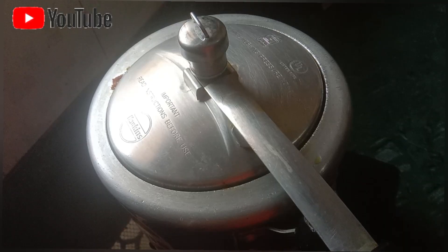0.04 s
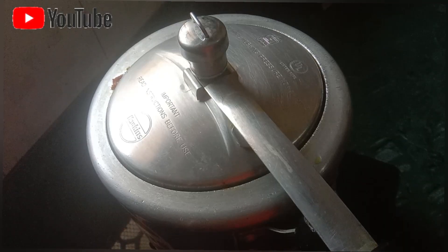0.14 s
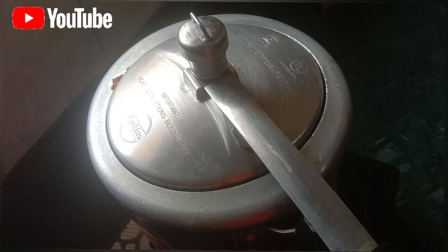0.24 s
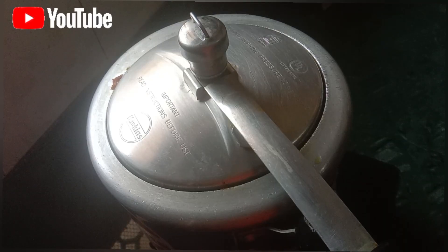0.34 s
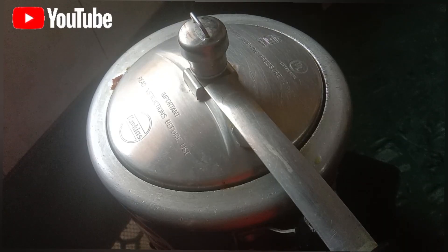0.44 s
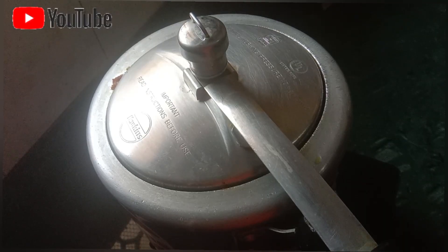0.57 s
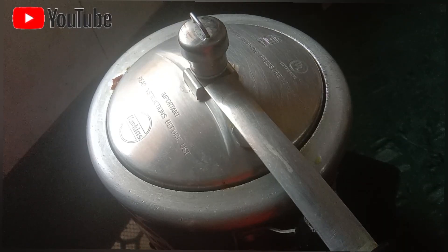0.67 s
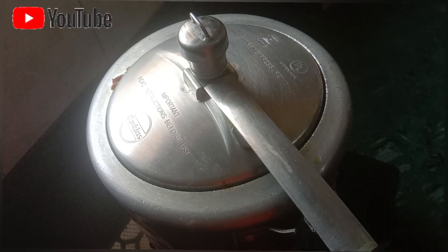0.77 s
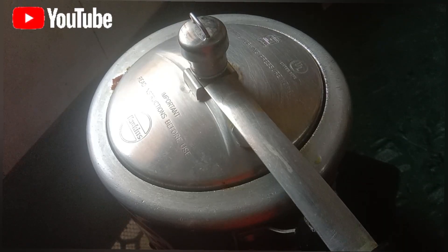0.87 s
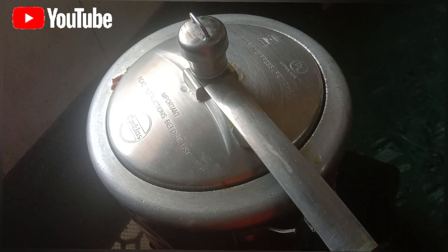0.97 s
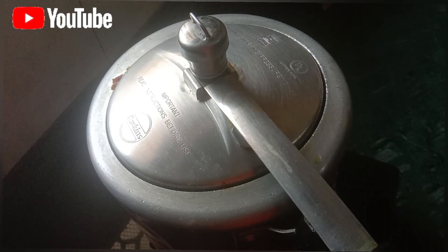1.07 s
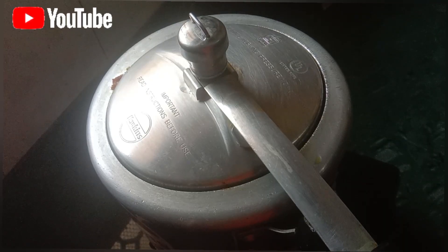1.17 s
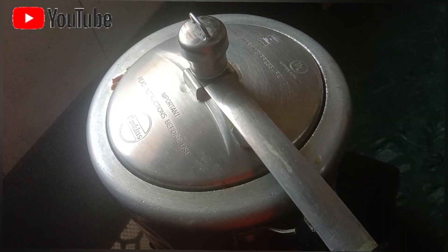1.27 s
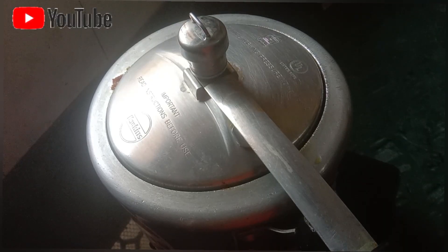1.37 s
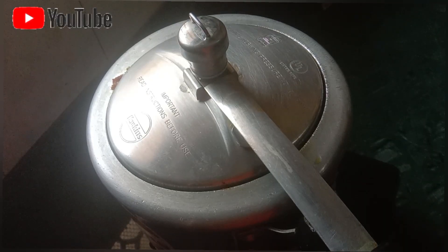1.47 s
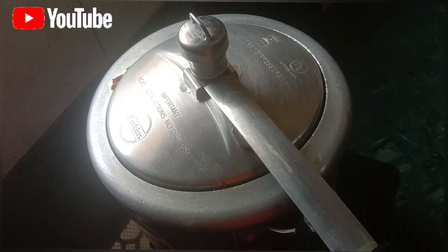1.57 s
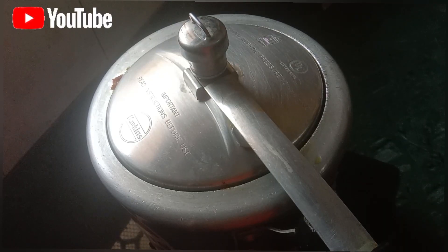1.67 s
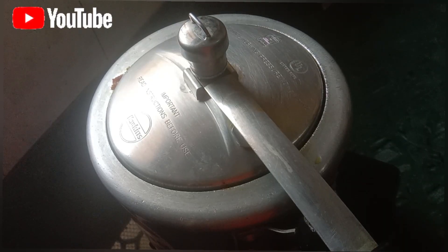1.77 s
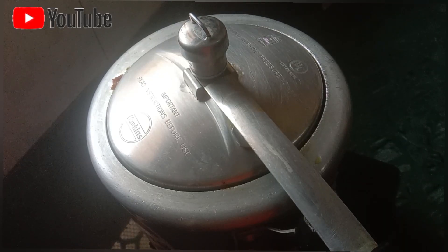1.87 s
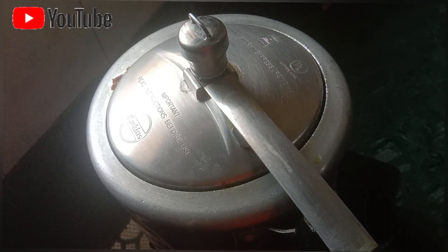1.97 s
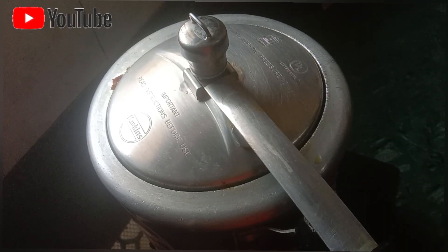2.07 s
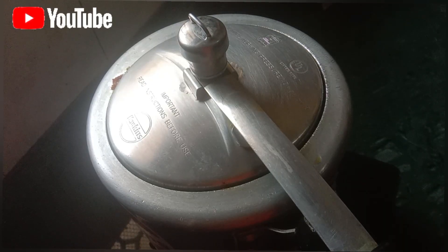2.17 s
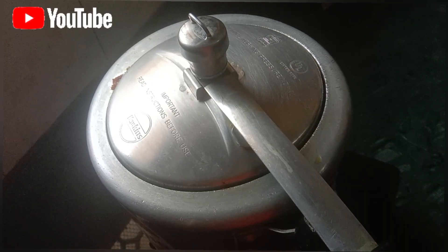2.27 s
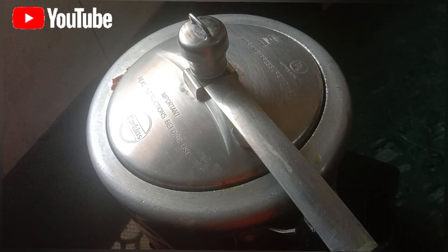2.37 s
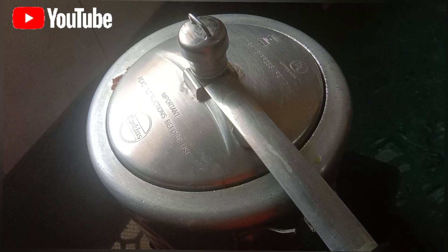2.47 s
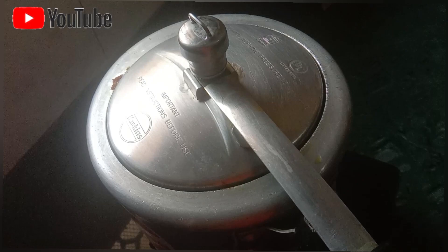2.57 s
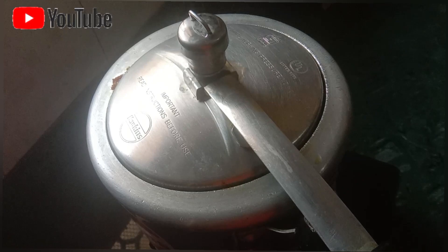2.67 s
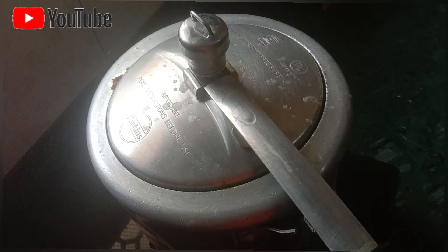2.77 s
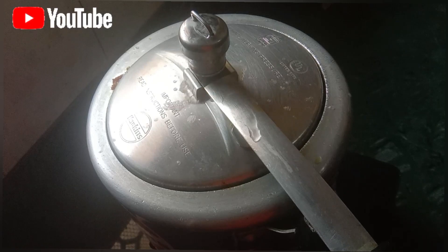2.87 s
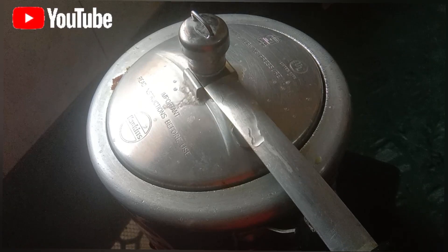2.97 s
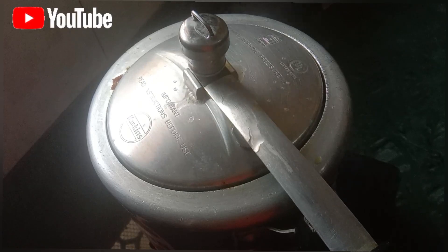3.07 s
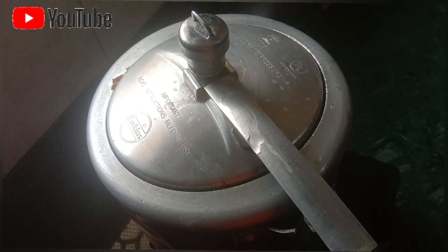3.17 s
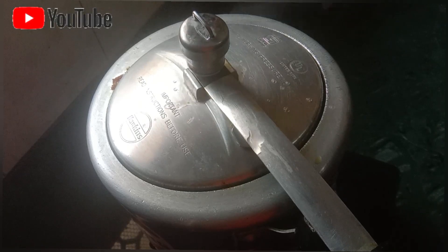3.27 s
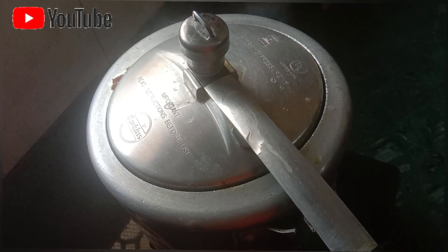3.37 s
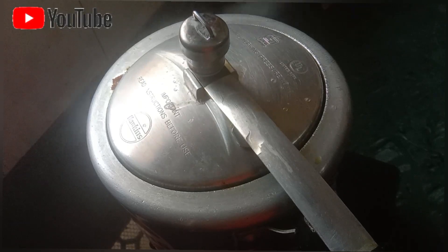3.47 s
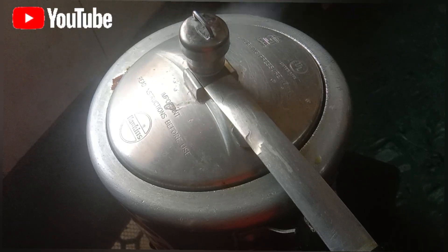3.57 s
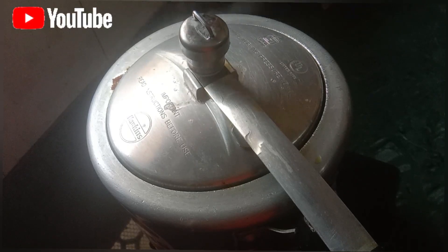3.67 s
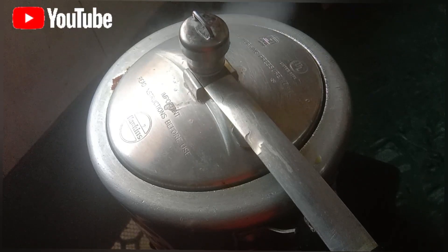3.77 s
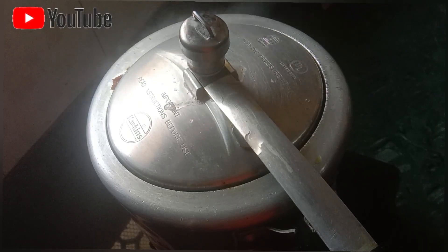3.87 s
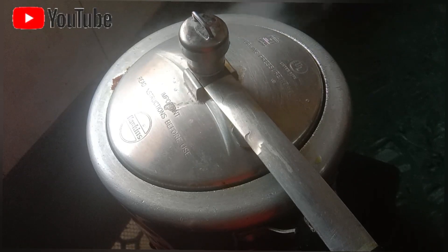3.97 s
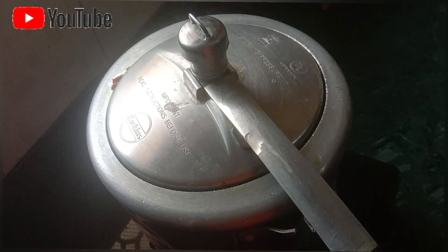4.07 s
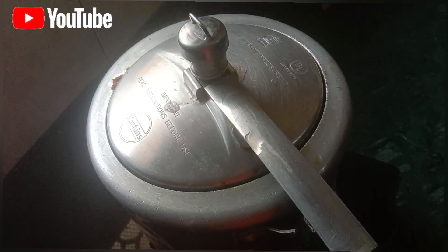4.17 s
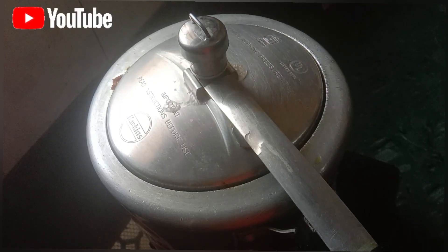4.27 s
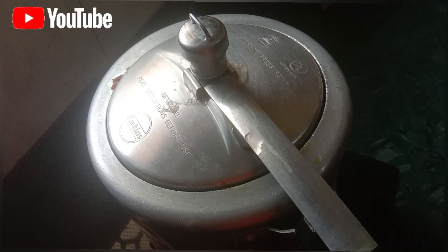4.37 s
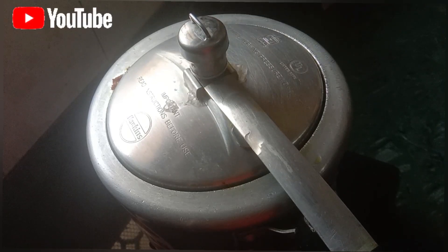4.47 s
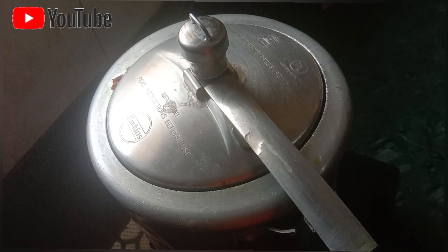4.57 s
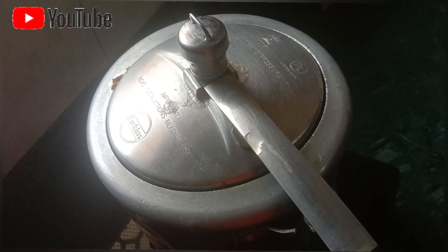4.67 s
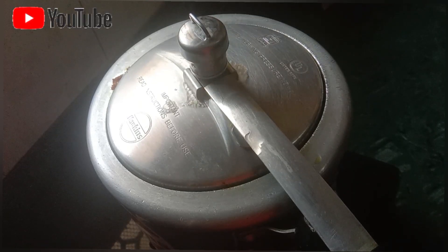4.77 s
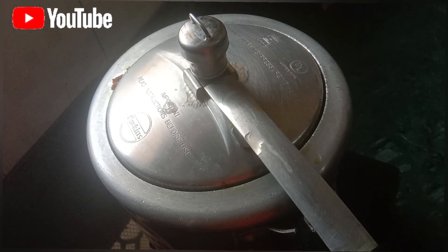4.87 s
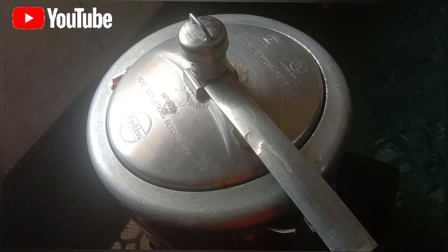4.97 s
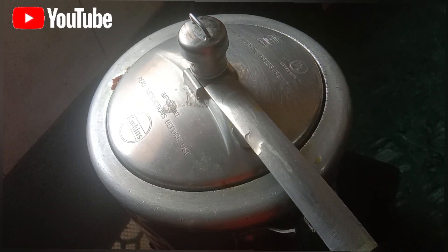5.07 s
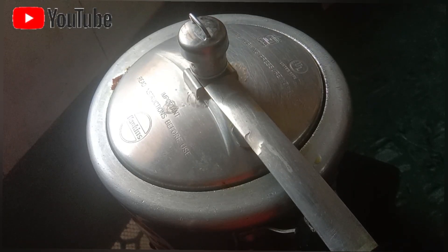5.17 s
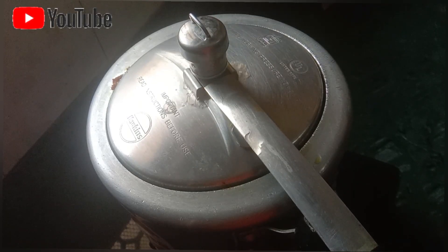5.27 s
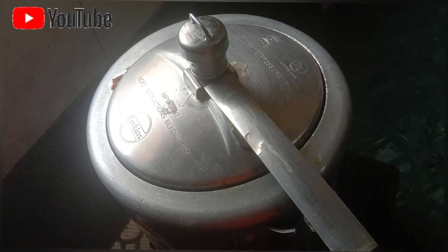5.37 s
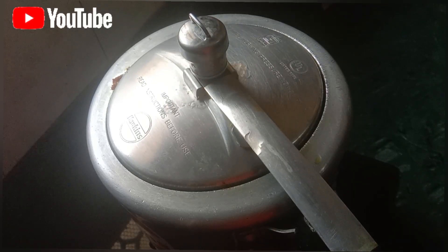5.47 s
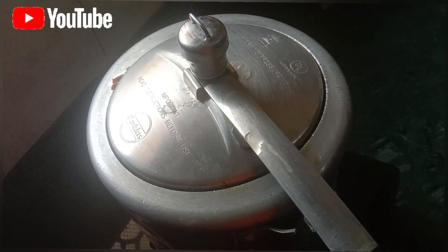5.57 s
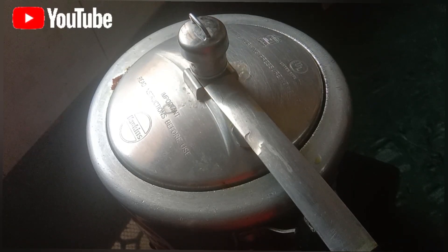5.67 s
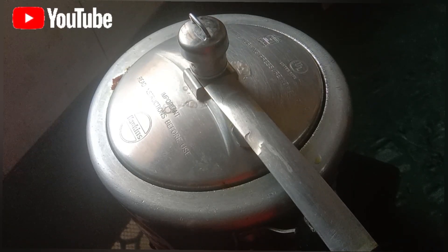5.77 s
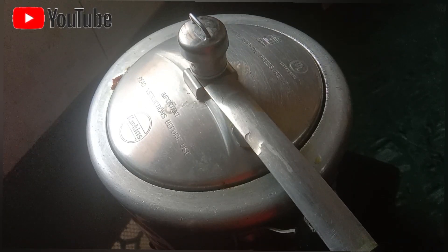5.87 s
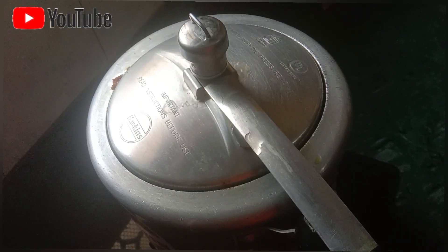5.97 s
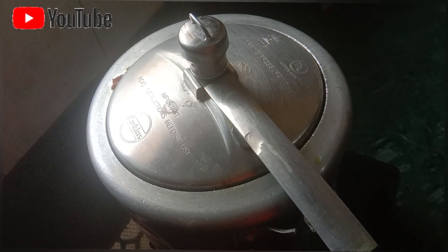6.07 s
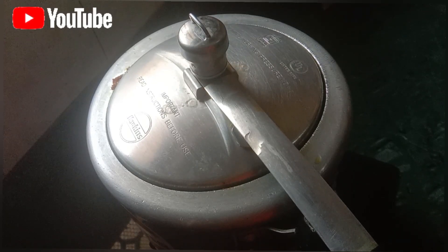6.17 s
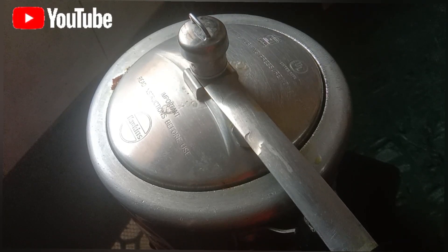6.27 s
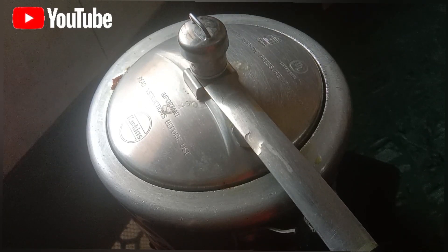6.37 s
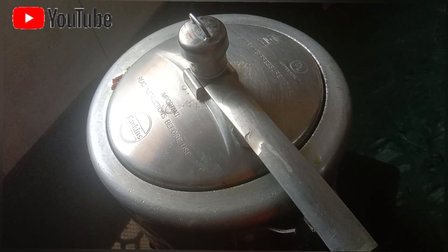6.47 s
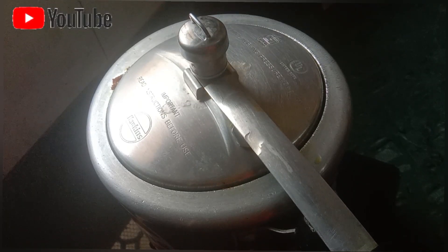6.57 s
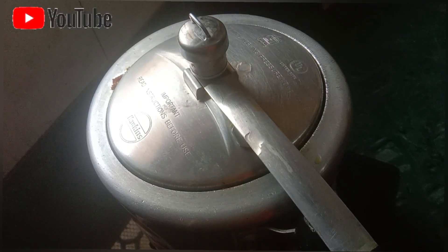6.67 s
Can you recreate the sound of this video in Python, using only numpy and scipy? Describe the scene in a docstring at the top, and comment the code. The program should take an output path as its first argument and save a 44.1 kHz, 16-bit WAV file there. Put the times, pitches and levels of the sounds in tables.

```python
"""A pressure cooker on a stove, a mono phone microphone close by. Steam hisses past the rocking weight
in uneven spurts of patchy noise, with two dull knocks of ringing modes early on. Then the weight lifts: the jet
roars and its blast buffets the microphone in dense random kicks. The weight drops back, the lid rings and sighs,
and the vent seals. A faint background runs throughout and is left at the end: room noise, a wavering hum,
short tonal blips."""
import sys
import numpy as np
from scipy import signal
from scipy.fft import rfft, irfft, next_fast_len
from scipy.io import wavfile
from scipy.ndimage import uniform_filter1d, map_coordinates

SR = 44100
rng = np.random.default_rng(int(sys.argv[2]) if len(sys.argv) > 2 else 0)


def to_wav(sig):
    """Store sig (one row per channel, or 1-D mono) as 16-bit WAV at the path in sys.argv[1].

    Samples outside -1..1 are clipped; the rate is SR.
    """
    pcm = np.clip(np.atleast_2d(sig), -1, 1) * 32767
    pcm = np.round(pcm).astype(np.int16)
    wavfile.write(sys.argv[1], SR, pcm.T)  # frames by channels


N = 296918

# Colour of the room noise. Each row: frequency in Hz, density in dB per Hz (relative).
ROOM_SPECTRUM = [(30, -26), (90, -6.5), (200, -5.5), (730, -11.5), (1170, -8.5), (1970, -11), (3400, -12.5),
                 (4090, -22), (5000, -13.5), (6000, -10), (7400, -7.5), (10500, -8), (10800, -21.5),
                 (13400, -21), (13600, -14.5), (15450, -11)]
# Room noise, sinking once the vent is quiet. Each row: time in seconds, level in dB, lift of its bands in dB.
ROOM_LEVELS = [(0, -54.5, 0), (2.5, -55.5, 0), (4.15, -52.5, 0), (4.4, -61, 1), (4.6, -63.5, -2),
               (5, -63.5, -2.5), (5.25, -63, 2), (5.9, -64, -1.5), (6.3, -64, 2), (6.73, -63, 0)]
# Restless bands of the room noise. Each row: centre in Hz, width in Hz, level in dB before that lift.
RESTLESS_BANDS = [(1340, 150, -72.5), (1524, 380, -71.5), (5150, 250, -80.5), (6485, 420, -71),
                  (6820, 180, -72), (7350, 120, -79.5), (7830, 200, -74), (15150, 500, -77)]
# Steadier overtones of the hum. Each row: frequency in Hz, level in dB relative to the room noise.
HUM_OVERTONES = [(200, -21.5), (300, -19.5)]
# Swells of the hum. Each row: start in seconds, length in seconds, level in dB.
HUM_SWELLS = [(.02, .16, -62), (.25, .56, -54.5), (1.43, .09, -67), (1.6, 0.16, -62), (1.76, 0.34, -51),
              (2.25, .06, -71), (4.12, .27, -52), (4.61, .24, -65), (5.01, .08, -73), (5.47, .15, -65),
              (6.14, .17, -72)]
# The clearest tonal blips. Each row: centre in seconds, mean pitch in Hz, level in dB before it wavers.
CLEAR_BLIPS = [(.419, 1096, -53), (.432, 885, -57), (.52, 130, -55.5), (.64, 497, -57), (.62, 302, -58),
               (.9, 682, -56.5), (1.39, 1455, -45), (1.399, 620, -55), (1.5, 1420, -51), (1.674, 1707, -48),
               (1.73, 140, -52.5), (4.78, 2300, -70), (4.92, 2230, -63.5), (5.65, 1650, -67),
               (5.91, 2340, -71), (6.07, 2110, -71), (5.13, 1700, -67.5), (5.2, 1550, -63.5),
               (5.22, 620, -65), (5.269, 1430, -61), (5.28, 5070, -66), (5.415, 1276, -56),
               (6.41, 5400, -69), (6.202, 1553, -63), (6.28, 1504, -64), (6.419, 1597, -58),
               (6.547, 1295, -65), (6.58, 140, -67), (6.7, 520, -69), (6.59, 1660, -62),
               (6.65, 1470, -61.5), (6.68, 1077, -55)]
# Dull knocks. Each row: start in seconds, nominal level in dB, time to ring down by 60 dB in seconds.
DULL_KNOCKS = [(.104, -26, 0.016), (.304, -27, 0.019)]
# What a knock sets ringing. Each row: frequency in Hz, relative level in dB.
KNOCK_RESONANCES = [(150, -3), (420, -4), (800, -3.5), (1150, 1.5), (1450, -5)]
# The weight dropping back on its seat. One row: time in seconds, nominal level in dB.
DROP_S, DROP_DB = (4.0815, -21.5)
# Modes of the lid. Each row: frequency in Hz, relative level in dB, time to ring down by 60 dB in seconds.
LID_MODES = [(1060, -11.5, 0.11), (1260, -0.5, 0.022), (1330, -6, .03), (1620, -3, .02), (1850, -9, .012)]
# Colour of one buffet at the microphone port. Each row: frequency in Hz, relative level in dB.
BUFFET_SPECTRUM = [(24, -49.5), (40, -20.5), (73, -8), (136, 0), (554, -2), (1180, -0.5), (1470, -2.5),
                   (2120, -10), (3260, -10.5), (4200, -18), (5460, -44.5), (9240, -120)]
# Single eddies that stand out. Each row: start in seconds, size in dB, share of sharp kick against slow push 0-1.
STRONG_GUSTS = [(2.742, -11, .25), (2.769, -7, .8), (2.784, -4, .7), (3.474, -3, .95), (3.98, -4, .95),
                (4.011, -8, .9), (4.038, -5, .4), (4.051, -15, .9)]
# Steam through the vent. Each row: time in seconds, hiss in dB, roar of the wider jet in dB relative to the hiss.
STEAM_LEVELS = [(0, -30.5, -16), (.1, -33, -20.5), (.7, -32.5, -20.5), (.77, -29.5, -21),
                (1.0, -32.5, -19.5), (1.14, -27, -20), (1.22, -39, -18), (1.31, -29.5, -18),
                (1.45, -33, -18.5), (1.52, -29, -18.5), (1.66, -29, -18), (1.76, -38, -16),
                (1.85, -29.5, -20.5), (1.97, -36, -19), (2.03, -27.5, -23), (2.13, -26.5, -12.5),
                (2.21, -32, -16), (2.26, -49, -17), (2.31, -33, -20), (2.37, -28.5, -17),
                (2.42, -33.5, -16.5), (2.475, -48, -17), (2.53, -31, -22), (2.6, -23.5, -11.5),
                (2.7, -24, -11), (2.76, -23, -11), (2.82, -25.5, -9), (2.95, -25.5, -5), (3.12, -24.5, .5),
                (3.35, -24.5, .5), (3.42, -26, -4), (3.75, -25, -1.5), (4.0, -26.5, -7), (4.09, -33.5, -10),
                (4.13, -33, -3.5), (4.16, -28.5, -5.5), (4.26, -39, -7.5), (4.39, -60.5, -16),
                (4.55, -77, -8)]
# How far the weight is lifted off the vent. Each row: time in seconds, lift 0-1.
WEIGHT_LIFT = [(0, 0), (2.55, 0), (2.7, .3), (2.82, 0.8), (4.03, 0.86), (4.07, .5), (4.3, 0.27)]
# Resonances and hollows around weight and lid. Each row: centre in Hz, width in Hz, boost in dB.
VENT_RESONANCES = [(1430, 94, 2.5), (1670, 72, 3.5), (2520, 150, 2), (3180, 180, 1), (3780, 130, 4),
                   (4090, 190, -4.5), (4480, 89, -4.5), (5330, 87, -2.5), (5750, 100, 1.5), (5910, 90, 1),
                   (6190, 110, 4), (6400, 80, 1.5), (6520, 80, 3.5), (6700, 79, -2.5), (6880, 120, 3),
                   (7070, 63, 1), (7280, 300, 3.5), (7900, 88, -5), (9320, 170, -3.5), (10700, 150, -5.5),
                   (12260, 180, 4), (12700, 150, -3), (13730, 150, 3.5), (14100, 120, -2.5),
                   (15250, 120, -1.5)]
# Colours of hiss, its top and the roar, for the weight seated and then lifted.
# Each row: frequency in Hz, density in dB per Hz (relative).
SEATED_HISS = [(2590, -47), (4400, -16), (4820, -6.5), (5380, -4.5), (5930, 0), (6540, -4), (7140, -3),
               (7990, -10.5), (9350, -14), (10100, -12.5), (10500, -10), (13600, -42.5), (22000, -120)]
SEATED_TOP = [(6200, -47), (10500, -20), (11800, -17), (12800, -12), (13400, -8), (14100, -4.5),
              (14500, -0.5), (14900, 1), (15150, -1.5), (15500, -6)]
SEATED_ROAR = [(150, -40), (300, -25.5), (550, -21), (750, -23.5), (1000, -11), (1150, -6), (1700, -1.5),
               (2050, -12.5), (2500, -2.5), (3300, -2.5), (3700, -1.5), (4050, -11.5), (4500, -18),
               (5500, -45.5)]
LIFTED_HISS = [(2240, -35), (3800, -13.5), (4190, -8), (5030, 1), (6280, -1.5), (6920, -7), (7540, -5),
               (8170, -11.5), (8710, -8), (9400, -13), (10500, -8.5), (13600, -41), (22000, -120)]
LIFTED_TOP = [(6200, -45.5), (10500, -15.5), (12900, -11), (13400, -11), (13800, -7), (14300, -8),
              (14900, 1.5), (15500, -4)]
LIFTED_ROAR = [(88, -44), (150, -14), (210, -11), (425, -24), (522, -18), (732, -29), (1090, -0.5),
               (2170, -12.5), (3360, -6), (3780, -11), (5000, -4), (6500, -33), (11000, -120)]

# Hum: pitch, level between swells, noise against line, share of a swell spent rising.
HUM_HZ, HUM_REST_DB, HUM_FUZZ, SWELL_RISE = 92, -84, 0.49, 0.32
BLIP_HALF_S = .05
# Fainter blips: number, central pitch, spread of pitch, central level relative to the room noise.
FAINT_COUNT, FAINT_HZ, FAINT_OCTAVES, FAINT_DB = 24, 1500, .2, -9
# The last steam singing in the lid; then the level of its lowest mode relative to the rest, and how long it holds.
SIGH_DB, SIGH_HOLD_S, SIGH_FADE_DB_PER_S = -41, .15, 148
SIGH_LOW_DB, SIGH_LOW_S = -2.5, .11
BLAST_ON_S, BLAST_ATTACK_S, BLAST_OFF_S, BLAST_RELEASE_S = 2.738, .036, 4.0, .072
BLAST_DB, BLAST_SWAY_DB = -17.5, .6
TOP_DB, TOP_OPEN_DB = 6, -2.5  # top of the hiss relative to the hiss; its change at full lift
TOP_FADE_DB_PER_S, TOP_FADE_MAX_DB = 70, 21  # after the drop the top dies first
SEAL_S, SEAL_TAKES_S = 4.38, .12
BAND_LIMIT_HZ = 15520


def amp(db):
    """Gain of a level in dB."""
    return 10 ** (np.asarray(db) / 20)


def unit(x):
    """Scaled to rms 1."""
    return x / np.sqrt(np.mean(x ** 2) + 1e-20)


def along(points, hz):
    """Values between (Hz, value) points, read on a log frequency axis."""
    f, v = np.transpose(points)
    return np.interp(np.log(hz + 1), np.log(f + 1), v)


def curves(rows):
    """One value per sample for each column after the time."""
    s, *cols = np.transpose(rows)
    return [np.interp(np.arange(N) / SR, s, c) for c in cols]


def wobble(rate):
    """A smooth random curve, rate knots a second."""
    knots = rng.standard_normal(int(N * rate / SR) + 4)
    return map_coordinates(knots, [np.arange(N) * rate / SR])


def filtered(x, response):
    """x times a response of frequency."""
    m = next_fast_len(N + 8192)
    return irfft(rfft(x, m) * response(np.fft.rfftfreq(m, 1 / SR)), m)[..., :N]


def patchy(depth_db):
    """White noise with patches of random gain in time and frequency."""
    z = signal.stft(rng.standard_normal(N), nperseg=512)[2]
    field = uniform_filter1d(rng.standard_normal(z.shape), size=4, axis=0)
    field = uniform_filter1d(field, size=6, axis=1)
    return signal.istft(z * amp(depth_db * unit(field)), nperseg=512)[1][:N]


def coloured(x, spectrum, peaks=()):
    """x with a spectrum and narrow boosts or hollows, rms 1."""
    def response(hz):
        boost = sum(db / (1 + ((hz - c) / w * 2) ** 2) for c, w, db in peaks)
        return amp(along(spectrum, hz) + boost)
    return unit(filtered(x, response))


def band(hz, width, depth_db):
    """A narrow band of patchy noise, rms 1."""
    return unit(filtered(patchy(depth_db), lambda f: np.exp(-((f - hz) / width * 2) ** 2)))


def causal(spectrum):
    """The pulse with this spectrum that starts at once (minimum phase, by folding the cepstrum)."""
    size = 2 ** 13
    gain = amp(along(spectrum, np.fft.rfftfreq(size, 1 / SR)))
    cepstrum = irfft(np.log(gain + 1e-6))
    cepstrum[1:size // 2] *= 2
    cepstrum[size // 2 + 1:] = 0
    return irfft(np.exp(rfft(cepstrum)))[:size // 2]


def hum(room_db):
    """A low line with a fuzzy edge that swells now and then, over steadier overtones."""
    t = np.arange(N) / SR
    level = amp(HUM_REST_DB)
    for start, length, db in HUM_SWELLS:
        swell = np.interp((t - start) / length, [0, SWELL_RISE, 1], [0, 1, 0])
        level = level + amp(db) * np.sqrt(swell)
    line = np.sin(2 * np.pi * HUM_HZ * t)
    out = level * amp(1.5 * wobble(12)) * unit(line + HUM_FUZZ * band(HUM_HZ, 40, depth_db=0.6))
    for hz, db in HUM_OVERTONES:
        out += amp(room_db + db + 3.5 * wobble(8.3)) * np.sin(2 * np.pi * hz * t)
    return out


def blips(room_db):
    """Short tones with wandering pitch: the listed ones and a random scatter of fainter ones."""
    t, out = np.arange(N) / SR, np.zeros(N)
    centre = BLIP_HALF_S + rng.random(FAINT_COUNT) * (N / SR - 2 * BLIP_HALF_S)
    pitch = FAINT_HZ * 2 ** (FAINT_OCTAVES * rng.standard_normal(FAINT_COUNT))
    level = room_db[(centre * SR).astype(int)] + FAINT_DB + 2.5 * rng.standard_normal(FAINT_COUNT)
    faint = zip(centre, np.minimum(pitch, SR / 3), level)
    for s, hz, db in list(CLEAR_BLIPS) + list(faint):
        span = slice(round((s - BLIP_HALF_S) * SR), round((s + BLIP_HALF_S) * SR))
        cycles = np.cumsum(hz * (1 + 0.012 * wobble(45)[span])) / SR
        window = np.cos(np.pi / 2 * (t[span] - s) / BLIP_HALF_S) ** 2
        out[span] += amp(db + 3.8 * wobble(60)[span]) * window * np.sin(2 * np.pi * cycles)
    return out


def background():
    """The faint background: broad patchy room noise with restless bands, the hum and the blips."""
    room_db, bands_db = curves(ROOM_LEVELS)
    out = amp(room_db) * coloured(patchy(depth_db=1.44), ROOM_SPECTRUM)
    for hz, width, db in RESTLESS_BANDS:
        out += amp(db + bands_db + 1.5 * wobble(6)) * band(hz, width, depth_db=3.0)
    return out + hum(room_db) + blips(room_db)


def knocks():
    """Each dull knock rings a few short modes that die away together."""
    out, t = np.zeros(N + SR), np.arange(SR // 4) / SR
    ring = sum(amp(level) * np.sin(2 * np.pi * hz * t) for hz, level in KNOCK_RESONANCES)
    onset = 1 - np.exp(-t / .0004)
    for s, db, t60 in DULL_KNOCKS:
        # the 9.5 dB cut allows for the modes adding up
        out[round(s * SR):][:len(t)] += amp(db - 9.5 - 60 * t / t60) * ring * onset
    return out[:N]


def drop():
    """The falling weight sets the lid ringing briefly; the dying steam keeps its modes sounding."""
    out, t = np.zeros(N), np.arange(SR // 4) / SR
    ring = sum(amp(db - 60 * t / t60) * np.sin(2 * np.pi * hz * t) for hz, db, t60 in LID_MODES)
    out[round(DROP_S * SR):][:len(t)] = amp(DROP_DB) * ring * (1 - np.exp(-t / 0.00086))
    since = np.arange(N) / SR - DROP_S
    fade_db = SIGH_FADE_DB_PER_S * np.maximum(since - SIGH_HOLD_S, 0)
    level = (since > 0) * amp(SIGH_DB - fade_db + 1.5 * wobble(25))
    low = amp(SIGH_LOW_DB - 300 * np.maximum(since - SIGH_LOW_S, 0))
    return out + level * (band(1335, 240, depth_db=2.5) + low * band(1095, 60, depth_db=3.0))


def blast():
    """Eddies of the jet strike the microphone port: dense, uneven pressure kicks on a rumble."""
    struck = rng.random(N) < 1100 / SR  # about 1100 strikes a second
    kicks = unit(struck * rng.standard_normal(N) * amp(3.49 * rng.standard_normal(N)))
    lumps = unit(amp(1.7 * wobble(150) + 0.47 * wobble(25.24)) * rng.standard_normal(N))
    kick = causal(BUFFET_SPECTRUM)
    buffeting = unit(signal.fftconvolve(1.2 * kicks + lumps, kick)[:N])
    s = np.arange(N) / SR
    rise = np.clip((s - BLAST_ON_S) / BLAST_ATTACK_S, 0, 1) ** 3.2
    fall = np.clip(1 - (s - BLAST_OFF_S) / BLAST_RELEASE_S, 0, 1) ** 1.8
    out = amp(BLAST_DB + BLAST_SWAY_DB * wobble(15)) * rise * fall * buffeting
    t = np.arange(len(kick)) / SR
    push = (1 - t / .0012) * np.exp(-t / .0012)  # a slow eddy pushes, then sucks back
    for (start, db, sharp), sign in zip(STRONG_GUSTS, rng.choice([-1, 1], len(STRONG_GUSTS))):
        gust = sharp * kick / kick.max() + (1 - sharp) * push
        out[round(start * SR):][:len(t)] += sign * amp(db) * gust
    return out


def steam():
    """Turbulence at the vent: fine eddies hiss, larger ones roar; the colour shifts as the weight lifts."""
    t = np.arange(N) / SR
    hiss_db, roar_db = curves(STEAM_LEVELS)
    lift = np.clip(curves(WEIGHT_LIFT)[0], 0, 1)
    seal_db = -40 * np.clip((t - SEAL_S) / SEAL_TAKES_S, 0, 1)
    flutter_db = .6 * wobble(14) + 0.64 * wobble(220)

    fine = patchy(depth_db=1.2)
    hiss = (1 - lift) * coloured(fine, SEATED_HISS, VENT_RESONANCES)
    hiss += lift * coloured(fine, LIFTED_HISS, VENT_RESONANCES)

    finest = patchy(depth_db=0.5)
    top = (1 - lift) * coloured(finest, SEATED_TOP, VENT_RESONANCES)
    top += lift * coloured(finest, LIFTED_TOP, VENT_RESONANCES)
    top_fade_db = np.clip(TOP_FADE_DB_PER_S * (t - DROP_S), 0, TOP_FADE_MAX_DB)
    top_db = TOP_DB + TOP_OPEN_DB * lift - top_fade_db
    top *= amp(top_db + 1.1 * wobble(20) + 0.69 * wobble(90))

    coarse = patchy(depth_db=2.0)
    wide = np.minimum(2 * lift, 1)  # the roar has its open colour from half lift on
    roar = (1 - wide) * coloured(coarse, SEATED_ROAR, VENT_RESONANCES)
    roar += wide * coloured(coarse, LIFTED_ROAR)
    roar *= amp(roar_db + 1.3 * wobble(18))
    return amp(seal_db + hiss_db + flutter_db) * (hiss + top + roar)


def scene():
    """One microphone feeds both channels; near walls add a short wash to the steam, knocks and drop."""
    air = steam() + knocks() + drop()
    t = np.arange(SR // 8) / SR
    walls = unit(rng.standard_normal(len(t)) * amp(-60 * t / 0.073)) / np.sqrt(len(t))  # 60 dB down in 73 ms
    wash = amp(-9.5) * signal.fftconvolve(air, walls)[:N]
    mono = air + wash + blast() + background()
    return np.array([mono, mono])


def record(dry):
    """The phone cuts the deepest bass, rounds off the highest peaks and keeps nothing above its band limit."""
    thin = filtered(dry, lambda hz: 1j * hz / (1j * hz + 45))
    rounded = thin / (1 + np.abs(thin / .75) ** 4) ** (1 / 4)
    return filtered(rounded, lambda hz: hz < BAND_LIMIT_HZ)


dry = scene()
out = record(dry)
to_wav(out)
```